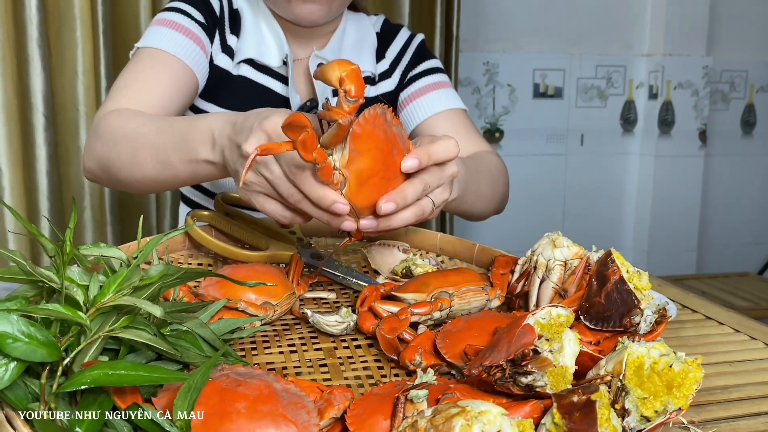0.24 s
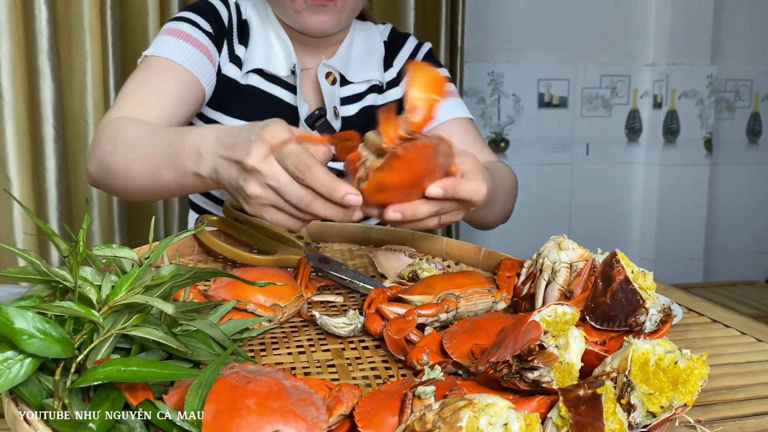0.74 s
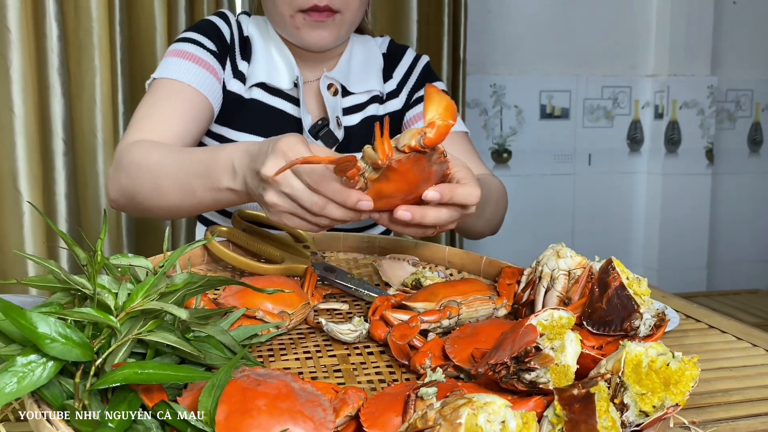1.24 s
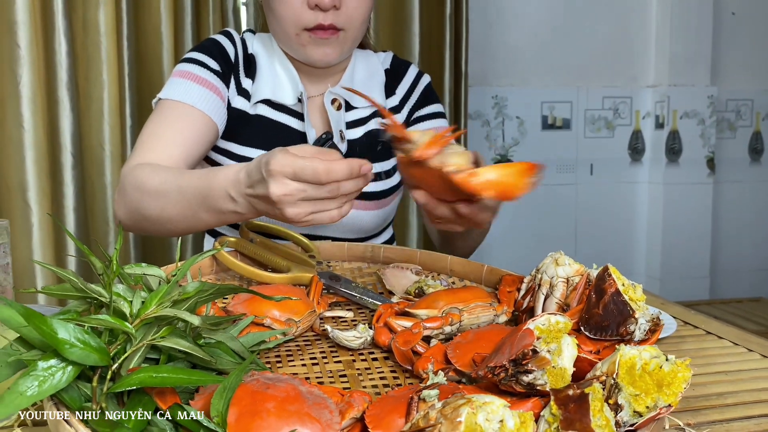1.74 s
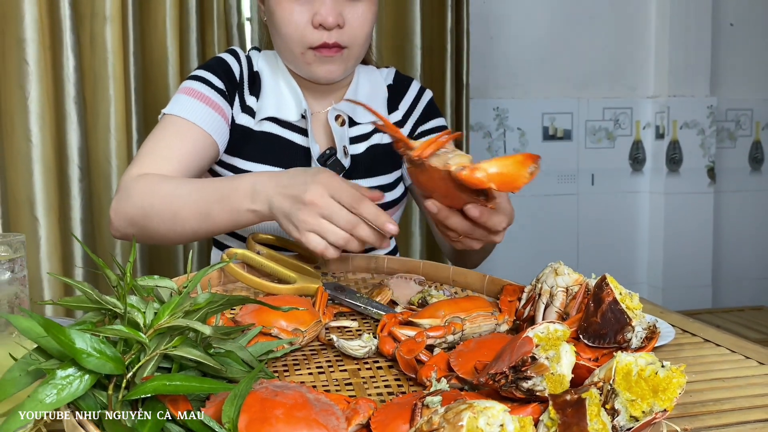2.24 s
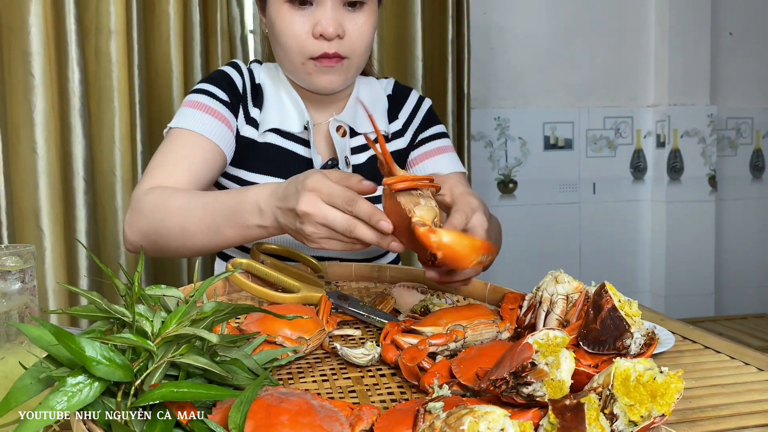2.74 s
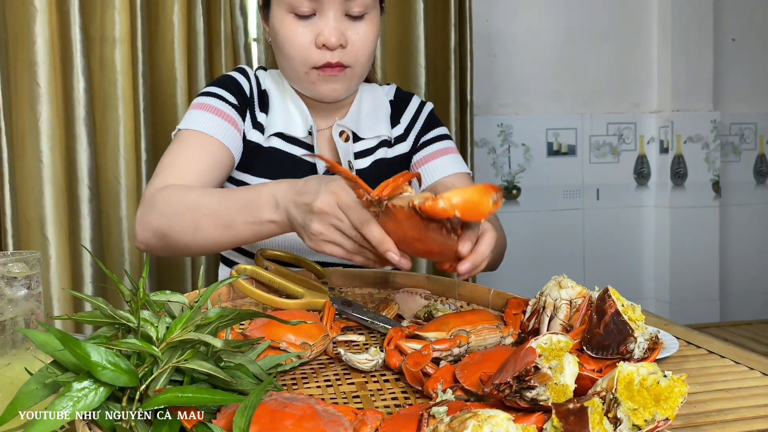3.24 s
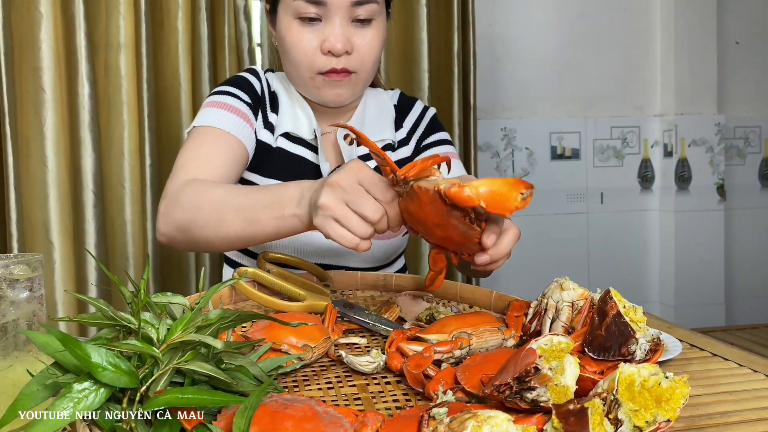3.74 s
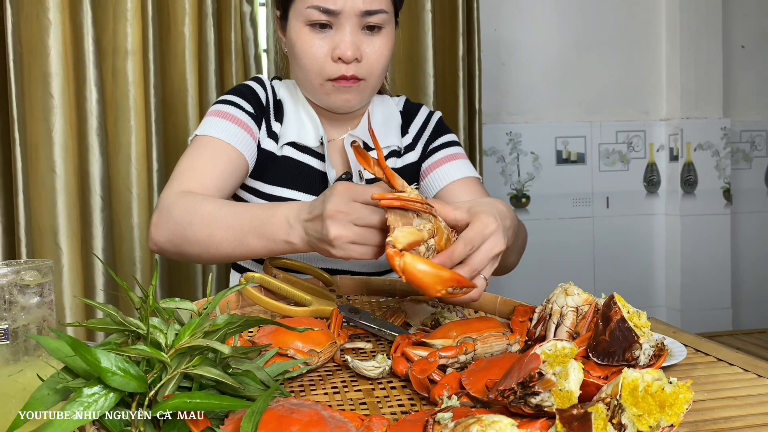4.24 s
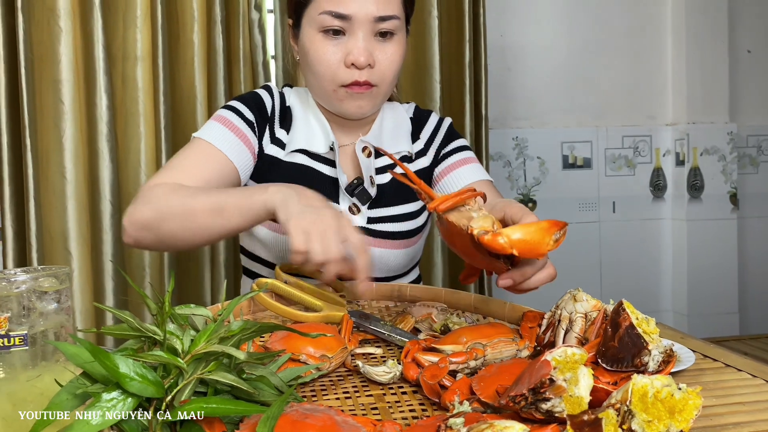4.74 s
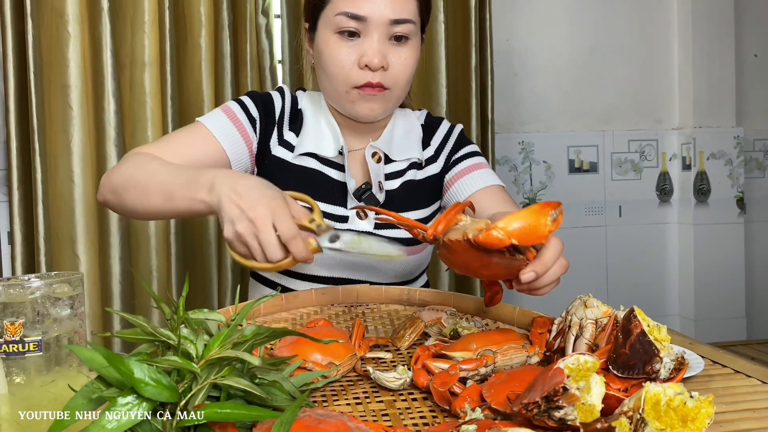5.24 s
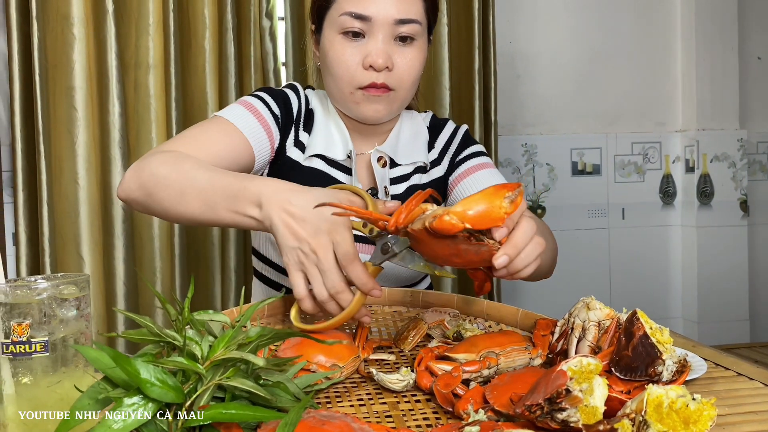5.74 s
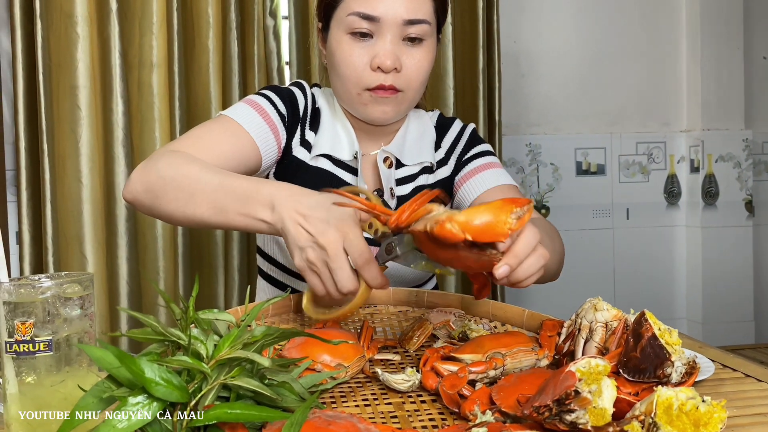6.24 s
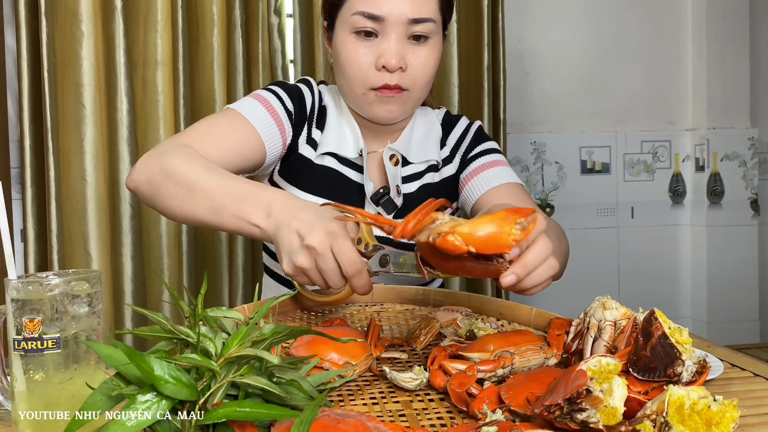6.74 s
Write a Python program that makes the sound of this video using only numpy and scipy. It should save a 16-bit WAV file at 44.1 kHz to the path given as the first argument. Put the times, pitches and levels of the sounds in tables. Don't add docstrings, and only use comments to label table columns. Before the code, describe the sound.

Dry brittle shell snaps with hollow knocks, a short steel scissors clink, then hard crunching cuts and one sharp final crack in a quiet room.

```python
import sys
import numpy as np
from scipy import signal
from scipy.fft import rfft, irfft
from scipy.io import wavfile
from scipy.ndimage import uniform_filter1d

SR = 44100
rng = np.random.default_rng(int(sys.argv[2]) if len(sys.argv) > 2 else 0)


def store_wav(level_fs):
    pcm = np.round(np.clip(np.atleast_2d(level_fs), -1, 1) * 32767)
    wavfile.write(sys.argv[1], SR, pcm.T.astype(np.int16))


def invert_db(level):
    return 10 ** (np.asarray(level, dtype=float) / 20)


N = 308700


def evened(x):
    return x / np.sqrt(np.mean(x ** 2) + 1e-20)


def topped(x):
    power = uniform_filter1d(abs(signal.hilbert(x)) ** 2, size=40)
    return x / np.sqrt(power.max(-1, keepdims=True) + 1e-20)


def read(points, hz):
    f, value = np.transpose(points)
    return np.interp(np.log(hz + 1), np.log(f + 1), value)


def add(mix, s, sound):
    part = mix[round(s * SR):][:len(sound)]
    part += sound[:len(part)]


def causal(colour_db):
    log_gain = np.log(invert_db(np.maximum(colour_db, -100)))
    circle = np.concatenate([log_gain, log_gain[..., -2:0:-1]], -1)
    return np.exp(np.conj(signal.hilbert(circle)))[..., :log_gain.shape[-1]]


def peak_db(hz, centre_hz, width_hz):
    return -10 * np.log10(1 + (2 * (hz - centre_hz) / width_hz) ** 2)


# start in seconds, crack level in dB, brightness in dB, splinter ring in Hz.
SPLINTERS = [(0.5163, -43, -26.5, 3200), (.6971, -53, 6, 4740), (0.7065, -45, 5, 7800),
             (.7106, -48, -7, 3400), (0.7733, -35.5, -14, 3550), (0.778, -28, -2.5, 7850),
             (0.7827, -33, -4.5, 3730), (0.8397, -35.5, -2, 3550), (1.229, -54, 2.5, 3620),
             (1.2396, -44, 0, 3450), (1.2723, -40, 7, 5430), (1.313, -51, 11, 3250),
             (1.4794, -45.5, -5, 8050), (1.499, -43.5, 4, 8060), (1.5145, -31.5, 1.5, 8000),
             (1.527, -43, -5, 7200), (1.6306, -39.5, 0, 7700), (2.1504, -33, -10, 3660),
             (3.7845, -45, -3.5, 5030), (4.002, -29.5, 6.5, 2030), (4.009, -41, 10, 4030),
             (4.2857, -45, 8, 2150), (4.314, -40, -3, 2000), (4.3182, -37.5, 6, 8500),
             (6.184, -51.5, 8.5, 7620), (6.2343, -24.5, 9.5, 7150), (6.2845, -23.5, 7, 4200),
             (6.334, -31, -2, 4500), (6.766, -43, 8, 8500), (6.7757, -13.5, 6, 6000)]
# start in seconds, crack in dB, hollow knock in dB re crack, brightness in dB, ring in Hz.
HAND_BREAKS = [(0.322, -44, -10, 4, 4060), (0.4996, -26, -4, -.5, 3370), (0.7378, -24, -19.5, -0.5, 3300),
               (0.7599, -19.5, -22, -3, 7800), (.768, -35, -3, -6.5, 3360), (0.8009, -31, -8, 0, 2210),
               (1.2757, -41, -8, 7, 4170), (1.7035, -30.5, -10.5, -9, 5660), (1.7224, -38, -1.5, -11, 5300),
               (2.7541, -56.5, 3, -1, 7850), (3.6282, -26.5, -14, 1.5, 8050), (3.6837, -28.5, -1, -6, 3500),
               (3.7482, -33.5, -15, -1, 6000), (3.8877, -21.5, -12.5, 5, 5630), (3.8929, -32, -9, 6, 5840),
               (3.9223, -33.5, -3, -3, 1940), (3.9515, -35.5, -12.5, 2, 2000),
               (3.9778, -33, -1.5, 1.5, 3260), (4.0496, -28.5, -8.5, 1.5, 9300),
               (4.0966, -16.5, -12, 11.5, 3160), (4.0998, -23, -2, -0.5, 3000),
               (4.2159, -39, -1, 5.5, 3020), (4.235, -41.5, 6, 1, 1880), (4.2664, -42, 10.5, -4, 2040)]
BLADE_BREAKS = [(5.6856, -38.5, 6, -7.5, 1940), (6.2474, -31, -15, 1, 4200), (6.2758, -22, -9.5, -9, 4940),
                (6.2804, -28, -6.5, -4, 3660), (6.2879, -9.5, -15.5, 12, 7600), (6.307, -28, -5, -6, 7800),
                (6.3133, -33, -8, -6, 4500), (6.3922, -24.5, -13.5, -4, 4700),
                (6.4872, -13.5, -13.5, 1, 3340), (6.5225, -17, -12.5, -0.5, 3500),
                (6.642, -26, -11.5, -1.5, 8500)]
# start in
# seconds, crack in dB, hollow knock in dB re crack, ring in Hz, length in ms.
TEARS = [(0.8074, -39.5, -38, 3450, 7.4), (1.3, -44.5, -7, 4500, 6.4), (1.3053, -47, -5, 2080, 7.8),
         (1.6932, -42, -0.5, 3300, 4.2), (2.1202, -53.5, -13.5, 2270, 7.1), (2.569, -49.5, -1, 4160, 5.5),
         (2.6252, -50, -13, 2240, 8.5), (4.295, -43, -4, 8790, 3.5), (4.3395, -35, 3, 2080, 4.7),
         (4.608, -49, 2.5, 13300, 3.4), (5.1592, -40, -38, 4430, 8), (5.701, -47, -1.5, 1830, 4.5),
         (5.7032, -53, 5, 1980, 4.5), (5.862, -65, 19, 7010, 12), (5.935, -73, 20.5, 6200, 4.85),
         (5.054, -54, -6, 3100, 7.7), (6.002, -44.5, 1.5, 4350, 6.7)]
CUTS = [(6.2725, -35, -20, 13500, 3), (6.2972, -16.5, -11, 7260, 4.1), (6.322, -28.5, -40, 2930, 13),
        (6.3304, -25, -31, 4140, 6.9), (6.4088, -35.5, -36, 4900, 7.2), (6.4447, -40.5, -25, 4800, 5.8),
        (6.5395, -30, -2.5, 3350, 9), (6.5971, -34.5, -9, 2860, 6.9), (6.619, -38.5, -4.5, 8350, 9.1),
        (6.6734, -39, -7.5, 4100, 7.3), (6.703, -26, -24, 9540, 4.9), (6.7775, -1.5, -17, 7240, 5),
        (6.9875, -36, -45, 8000, 9.9)]
CHIPS = [(.7376, -25, -28, 7650, 2.3), (.7465, -39, -20, 3500, 2.8), (.7706, -38, -20, 3500, 3),
         (.7762, -40, -30, 8000, 2.2), (0.7837, -29, -11, 7000, 2.5), (0.7865, -40, -20, 3600, 2.9),
         (0.801, -35, -30, 6270, 2.8), (0.503, -45, -12, 2280, 5.4), (2.127, -57, -10, 4500, 3),
         (2.1353, -54, 8, 5200, 5.8), (2.14, -59, 5, 2100, 9), (2.1516, -38.5, -12, 2200, 3),
         (2.1536, -53, -20, 4000, 4), (3.6283, -32.5, -20, 3800, 2.4), (4.004, -39, -11, 11000, 3.3),
         (4.2161, -42.5, -30, 8000, 2.6), (4.2818, -53, 5, 5000, 3.7), (4.337, -52, -15, 7000, 4.2),
         (5.995, -45.5, 2, 4400, 22), (6.009, -45.5, 4.5, 7700, 6.1), (6.0244, -62.5, 14, 2000, 4.7),
         (5.842, -61.5, -10, 7000, 30), (6.2416, -53, -30, 14500, 2.5), (6.2907, -24, -17, 8500, 2.4),
         (6.2937, -25, -20, 13500, 2.7), (6.3003, -22.5, -8, 4500, 3), (6.3035, -21.5, -18, 7900, 5.1),
         (6.3165, -43.5, 12, 5000, 4.3), (6.4876, -23.5, -30, 9800, 2.7), (6.5442, -34.5, -3, 7500, 4.1),
         (6.659, -40, -17, 8000, 5), (6.694, -43, -20, 7800, 3.5), (0.4997, -33.5, -20, 2600, 2.2),
         (5.1657, -35, -30, 8900, 5), (5.1663, -37, -30, 13900, 5), (5.7088, -44.5, 9.5, 4000, 2.5),
         (6.7035, -25.5, -19, 4770, 3.76), (6.3075, -27, -20, 15000, 3.03), (5.9, -65, -20, 6100, 37),
         (6.2801, -26, -18, 6700, 2.6)]
# start in seconds, level in dB, ring in Hz.
TICKS = [(.0591, -63, 3450), (.0922, -62, 2000), (0.2093, -65, 6130), (.3427, -56, 8500),
         (1.1172, -66, 4950), (1.191, -61, 3500), (1.2196, -54, 4350), (1.248, -55, 4570),
         (1.294, -50, 3600), (1.4247, -64.5, 4220), (1.522, -50, 1940), (1.567, -57, 3490),
         (1.5863, -58, 8680), (1.6815, -54, 3920), (1.898, -63, 5000), (2.184, -57, 4070),
         (2.4964, -57, 2910), (2.6368, -49, 6800), (2.8364, -54, 3300), (2.9332, -57, 2090),
         (2.963, -54, 3780), (3.1713, -59.5, 4350), (3.5946, -57, 8980), (3.616, -52, 4070),
         (4.283, -48, 3540), (4.3313, -50, 3550), (5.0342, -51, 5800), (6.476, -43, 7920),
         (6.1887, -55, 7720), (6.2115, -58, 3480)]


def crack_rows():
    rows = [(s, db, -20.5, bright_db, hz, 2.1) for s, db, bright_db, hz in SPLINTERS]
    rows += [(*row, 2.41) for row in HAND_BREAKS]
    rows += [(*row, 2.9) for row in BLADE_BREAKS]
    rows += [(s, db, knock_db, -5.5 - 0.22 * knock_db, hz, ms) for s, db, knock_db, hz, ms in TEARS]
    rows += [(s, db, knock_db, 4.5, hz, ms) for s, db, knock_db, hz, ms in CUTS]
    rows += [(s, db, -16.5, -6.5, hz, 1.6) for s, db, hz in TICKS]
    rows += [(s, db, knock_db, -1.5, hz, ms) for s, db, knock_db, hz, ms in CHIPS]
    return np.array(rows, float)


def knock_colour(hz, centre_hz):
    low_db = 2 * peak_db(hz, centre_hz, 700)
    woody_db = peak_db(hz, 3.25 * centre_hz, 1200) - 13.5
    tilt_db = read([(60, -25), (280, -7.5), (500, 0.0), (3000, 2.2), (6000, -22.5)], hz)
    return np.maximum(low_db, woody_db) + tilt_db


# frequency in Hz, level in dB per Hz.
SHELL = [(300, -37), (1200, -2.5), (1900, -1.5), (2500, -5), (3400, 2), (5500, -2.5), (8000, -1),
         (11500, -6), (13500, 0.5), (15500, -6.5), (17000, -49)]
EVEN_BINS = (70, 14)


def cracks():
    s, db, knock_db, bright_db, ring_hz, ms = crack_rows().T[:, :, None]
    t, hz = np.arange(2048) / SR, np.fft.rfftfreq(2048, 1 / SR)
    noise, slips = rng.standard_normal((2, len(s), 2048))

    u = t / (np.maximum(ms - .9, .3) * 0.00025)
    burst = u ** 0.99 * np.exp(-u)
    crumble = invert_db(-22) * np.minimum(u, 1) * np.exp(-t / .003)
    stick_slip = invert_db(4.3 * evened(uniform_filter1d(slips, size=14)))
    fracture = rfft((burst + crumble) * noise * stick_slip)
    power = abs(fracture) ** 2
    run, shove = (fracture * causal(-10 * np.log10(uniform_filter1d(power, size=bins) + 1e-12))
                  for bins in EVEN_BINS)

    shell_db = read(SHELL, hz) + bright_db * np.clip((hz - 7500) / 2500, 0, 1)
    ring_db = np.maximum(10 + peak_db(hz, ring_hz, 0.15 * ring_hz), 0)
    cupped = abs(s - 5.85) <= .3
    hollow_hz = np.where(cupped, 558, 745) * invert_db(1.1 * noise[:, :1])
    hollow_db = knock_colour(hz, hollow_hz) * np.where(cupped, 1.7, 1)

    brittle = (run, db, shell_db + ring_db, shell_db + 0.22 * ring_db)
    hollow = (shove, db + knock_db, hollow_db, 0.28 * hollow_db)
    near, spread = np.zeros((2, N))
    for drive, level_db, colour_db, blurred_db in (brittle, hollow):
        direct = invert_db(level_db) * topped(irfft(drive * causal(colour_db)))
        blurred = irfft(causal(blurred_db))
        blurred /= np.linalg.norm(blurred, axis=1, keepdims=True)
        blurred *= np.linalg.norm(direct, axis=1, keepdims=True)
        for k, at in enumerate(s[:, 0]):
            add(near, at - .0001, direct[k])
            add(spread, at + ms[k, 0] / 2000, blurred[k])
    return np.array([near, spread])


# start in seconds, length in seconds, level in dB, fall in dB, knock in dB re level.
GRINDS = [
    (0.766, 0.054, -48, 23, -8),
    (1.712, 0.053, -41, 36, -2),
    (2.122, 0.028, -71, 0, 12),
    (5.693, 0.047, -60.5, 20, 11),
    (5.828, 0.085, -71.5, 4, 6),
    (5.994, .022, -60.5, -11, 5.5),
    (6.289, 0.06, -25, 20.5, -7),
    (6.536, 0.026, -40.5, 6, -10),
]


def grinds():
    hz, out = np.fft.rfftfreq(2048, 1 / SR), np.zeros(N)
    crack = irfft(causal(read(SHELL, hz)))
    knock = irfft(causal(knock_colour(hz, 550)))
    grain_size = invert_db(6.0 * np.minimum(rng.exponential(1, N // 40 + 1), 4))
    grit = rng.standard_normal(N) * grain_size.repeat(40)[:N]
    for s, length, db, fall_db, knock_db in GRINDS:
        t = np.arange(0, length, 1 / SR)
        part = grit[round(s * SR):][:len(t)]
        high, low = (evened(signal.fftconvolve(part, k)[:len(t)]) for k in (crack, knock))
        level = invert_db(db - 2.5 - fall_db * t / length) * signal.windows.tukey(len(t), .2)
        add(out, s, level * (high + invert_db(knock_db) * low))
    return out


# start in seconds, level in dB, length in ms.
THUDS = [
    (.4995, -39, 0.43),
    (2.1355, -51, .8),
    (4.609, -58, .8),
    (5.058, -51, 0.47),
    (5.8642, -52, 0.72),
    (6.002, -51, 0.94),
    (6.3, -46, .5),
]


def thuds():
    out = np.zeros(N)
    for s, db, ms in THUDS:
        u = np.arange(1024) / SR / (max(ms, .2) / 1000)
        add(out, s, invert_db(db) * u * (2 - u) * np.exp(1 - u))
    return out


# mode in Hz, level in dB, 60 dB decay in seconds.
BLADES_SHUT = [(1700, -20, .06), (3165, -20, .12), (3975, 0, .105), (3995, -23, .6), (5530, -13, .07),
               (6640, -19, .08), (7300, -1, .045), (7270, -25, .55), (8880, -11, .08), (10355, -10, .075),
               (12950, -7, .06), (12975, -25, .35), (13860, -12, .16), (14300, -4, .05)]
BLADES_OPEN = [(3860, -20, .03), (5390, -15, .06), (5572, -12, .04), (5520, -32, .2), (7181, -11, .043),
               (8250, 4, .026), (8300, -22, .09), (9640, -11, .035), (10170, -17, .045), (10350, -12, .04),
               (11300, -20, .05), (12800, -11, .035), (13950, -7, .035), (15250, -10, .022)]
# start in seconds, blow in dB, tick in dB, damping factor on the decay time.
CLINKS_SHUT = [
    (5.0640, -19, -11, 0.66),
    (5.067, -32.5, -20.5, 0.59),
    (5.0725, -43, -23.5, .5),
    (5.077, -44.5, -28, 0.45),
    (5.083, -49.5, -33, 0.54),
    (5.1655, -35.5, -30, 0.24),
]
CLINKS_OPEN = [
    (5.379, -23.5, -28.5, 0.3),
    (5.382, -25.5, -33, 0.74),
]


def scissors():
    t, out = np.arange(SR // 2) / SR, np.zeros((2, N))
    rattle_db = [(500, -19.0), (2000, -7.0), (10000, 0.5), (14200, -1.0), (15000, -23)]
    colour = irfft(causal(read(rattle_db, np.fft.rfftfreq(512, 1 / SR))))
    onset = 1 - np.exp(-t / 0.00058)
    for modes, clinks in ((BLADES_SHUT, CLINKS_SHUT), (BLADES_OPEN, CLINKS_OPEN)):
        hz, db, t60 = np.transpose(modes)[:, :, None]
        to_walls = invert_db(-13 + 0.65 * hz / 1000)
        for s, blow_db, tick_db, damp in clinks:
            each = invert_db(db - 60 * t / (t60 * damp)) * np.sin(2 * np.pi * hz * t)
            ring = invert_db(blow_db) * each.sum(0)
            sent = invert_db(blow_db) * (each * to_walls).sum(0)
            rattle = signal.fftconvolve(rng.standard_normal(len(t)), colour)[:len(t)]
            rattle *= invert_db(tick_db) * np.exp(-t / 0.0025)
            add(out[0], s, (ring + rattle) * onset)
            add(out[1], s, (sent + invert_db(-1.0) * rattle) * onset)
    return out


# delay in ms, level in dB.
BOUNCES = [(1.1, -31), (2.6, -24), (5.5, -25), (8.6, -23.5), (16, -24.5)]
# frequency in Hz, 60 dB decay in seconds.
ROOM_T60 = [(250, 0.4), (700, 0.47), (1700, 0.39), (4500, 0.53), (9000, 0.46), (14000, 0.34)]
# frequency in Hz, level in dB.
ROOM_COLOUR = [(250, -8.5), (850, 10), (1400, 5.5), (2600, -2.5), (3600, -2.5), (5000, -1.5), (9000, -4),
               (13500, -0.5), (16000, 2)]


def room(near, spread):
    out, turn = near.copy(), 2 * np.pi * 23 * np.arange(N) / SR
    for ms, db in BOUNCES:
        add(out, ms / 1000, invert_db(db) * near)
    for k in range(3):
        taps = np.zeros(SR)
        at = np.arange(150, SR - 12, 12)
        taps[at + rng.integers(0, 12, len(at))] = rng.choice([-1., 1.], len(at))
        hz, t, z = signal.stft(taps, SR, nperseg=256)
        z = z * invert_db(read(ROOM_COLOUR, hz)[:, None] - 60 * t / read(ROOM_T60, hz)[:, None])
        tail = signal.istft(z, SR, nperseg=256)[1][:SR] * (np.arange(SR) > 130)
        feed = np.sqrt(2 / 3) * np.cos(turn + 2 * np.pi * k / 3)
        out += invert_db(-12) * signal.fftconvolve(spread * feed, tail / np.linalg.norm(tail))[:N]
    return out


# start in seconds, level in dB, start and end pitch in Hz, length in seconds.
CHIRPS = [
    (.46, -122, 5500, 4000, 0.09),
    (1.111, -82, 5600, 3860, .13),
    (1.798, -83.5, 5470, 3900, 0.1),
    (2.166, -89, 4970, 3700, .09),
    (2.626, -83.5, 5600, 3830, 0.068),
    (3.279, -80.5, 5620, 3610, 0.1),
    (4.524, -81, 5460, 4000, 0.13),
    (5.752, -81.5, 5350, 3880, 0.15),
]


def bird():
    out, t = np.zeros(N), np.arange(SR // 3) / SR
    for s, db, start_hz, end_hz, length in CHIRPS:
        u = np.arange(0, 1, 1 / (length * SR))
        pitch_hz = start_hz + (end_hz - start_hz) * u ** 3.0
        swell = np.sin(np.pi * u ** 1.5) ** 0.38
        hoarse, echoes = rng.standard_normal((2, len(t)))
        chirp = np.sin(2 * np.pi * np.cumsum(pitch_hz) / SR) * swell
        chirp = chirp * uniform_filter1d(hoarse, size=70)[:len(u)]
        add(out, s, invert_db(db) * evened(signal.fftconvolve(chirp, echoes * invert_db(-60 * t / 0.5))[:len(t)]))
    return out


# start in seconds, level in dB, stretch factor on its throat, 60 dB decay in seconds.
FAR_CALLS = [
    (3.496, -68, 0.71, 0.79),
    (4.555, -65.5, 0.94, 0.6),
    (4.747, -66.5, 0.92, 0.63),
    (4.943, -66, 0.95, 1),
]
# resonance in Hz, width in Hz, level in dB.
FAR_THROAT = [(1850, 1500, -2.5), (4000, 150, -2), (4820, 340, -8.5), (6000, 300, -6.5)]


def far_bird():
    t, hz, out = np.arange(8192) / SR, np.fft.rfftfreq(8192, 1 / SR), np.zeros(N)
    for s, db, stretch, t60 in FAR_CALLS:
        throat = sum(invert_db(d + 2 * peak_db(hz, f * stretch, w)) for f, w, d in FAR_THROAT)
        call = evened(irfft(rfft(rng.standard_normal(len(t))) * throat))
        add(out, s, call * invert_db(db - 60 * t / t60) * signal.windows.tukey(len(t), .12))
    return out


# frequency in Hz, level in dB.
AIR = [(15, -34.5), (25, -10), (105, -6), (197, -6.5), (287, -1), (367, -9.5), (508, -7), (800, -14),
       (2520, -28.5), (11200, -34), (14600, -31), (15600, -50)]
# frequency in Hz, level in dB rms.
HUM = [(43.1, -74), (59.2, -82.5), (102.3, -71.5), (177.6, -75.5), (220.7, -84.5), (242.2, -88),
       (279.9, -77.5), (301.5, -74.5)]


def air():
    frames, hz = N // 512 + 5, np.fft.rfftfreq(2048, 1 / SR)
    a, b, patches = rng.standard_normal((frames, 1025, 3)).T
    patches = uniform_filter1d(patches, size=20, axis=0)
    patches = evened(uniform_filter1d(patches, size=8, axis=1))
    z = (a + 1j * b) * invert_db(read(AIR, hz)[:, None] + 1.0 * patches)
    out = invert_db(-66) * evened(signal.istft(z, nperseg=2048, noverlap=1536)[1][:N])
    t = np.arange(N) / SR
    beat = 1 + .7 * np.cos(2 * np.pi * 1.455 * (t - 3.28))
    for line_hz, db in HUM:
        depth = beat if 90 < line_hz < 110 else 1
        out += invert_db(db - 1.0) * depth * np.sin(2 * np.pi * (line_hz * t + rng.random()))
    return out


def scene():
    near, spread = cracks() + grinds() + scissors() + bird()
    return (room(near, spread) + thuds() + far_bird() + air())[None]


def roll_off(x):
    return signal.sosfilt(signal.butter(12, 16530, fs=SR, output="sos"), x)


def record(dry):
    band = signal.firwin(255, 15800, window=("kaiser", 8), fs=SR)
    banded = signal.oaconvolve(dry, band[None], "same")
    return roll_off(np.clip(banded, -1, 1))


dry = scene()
out = record(dry)
store_wav(out)
```